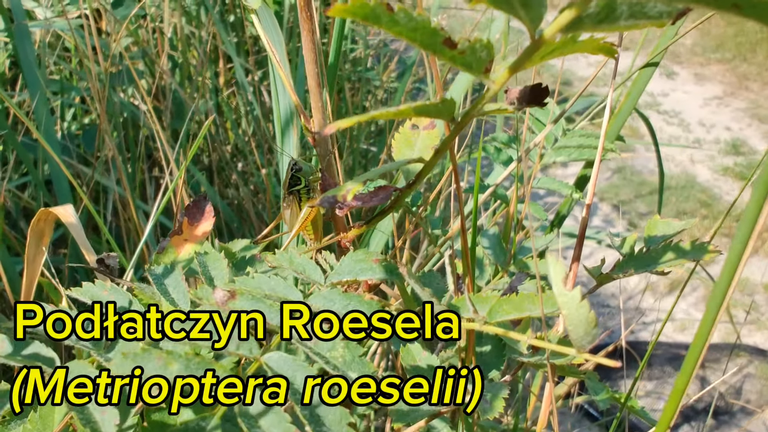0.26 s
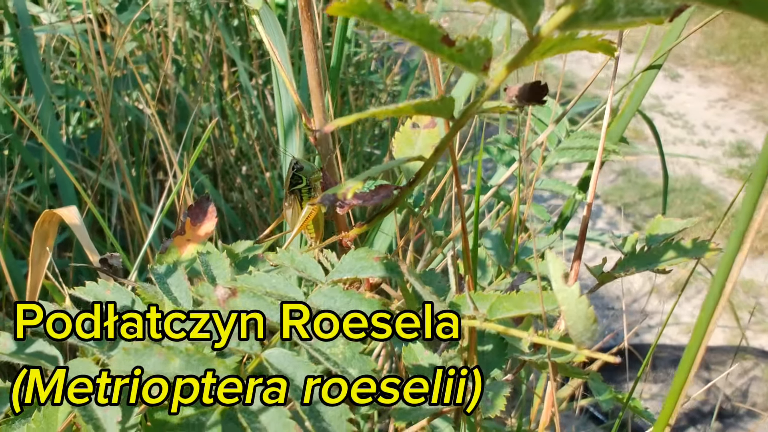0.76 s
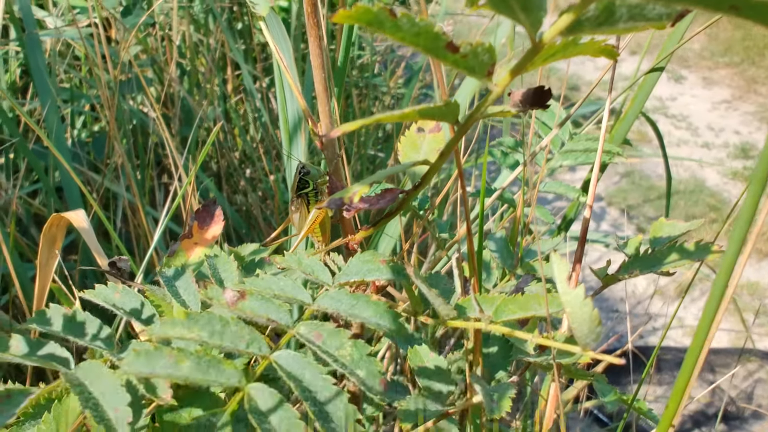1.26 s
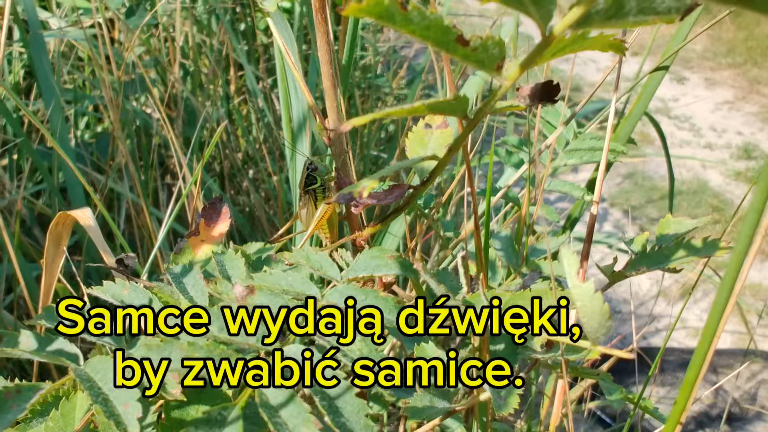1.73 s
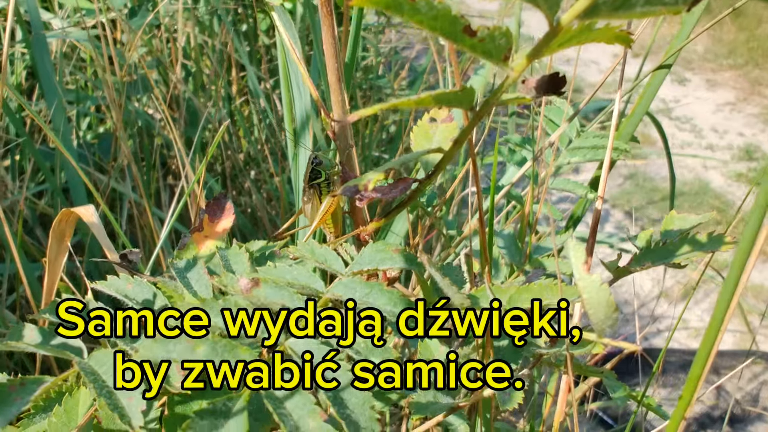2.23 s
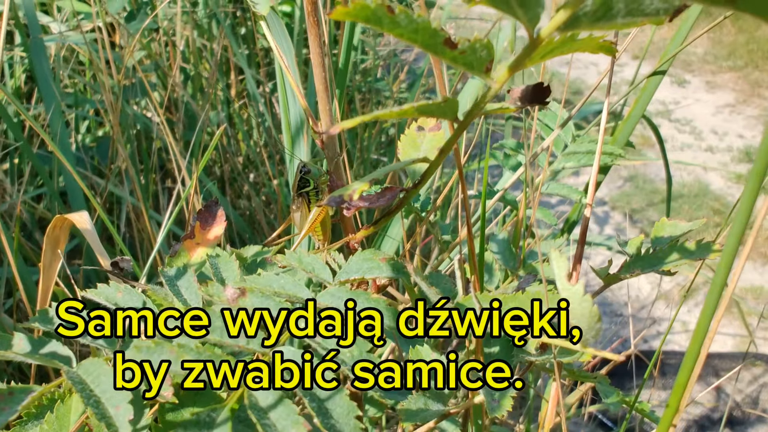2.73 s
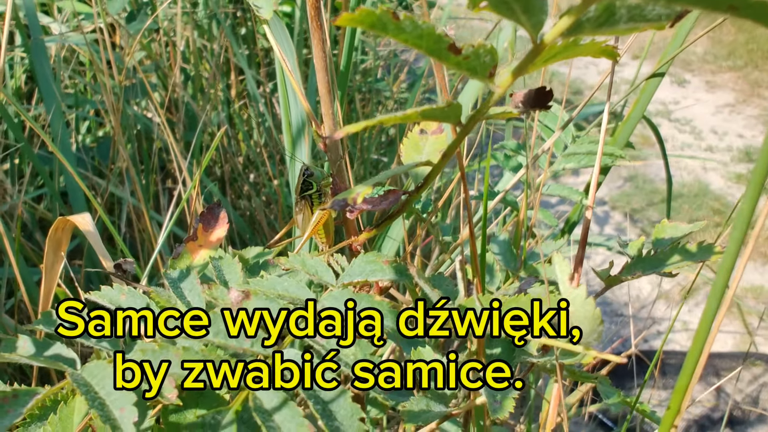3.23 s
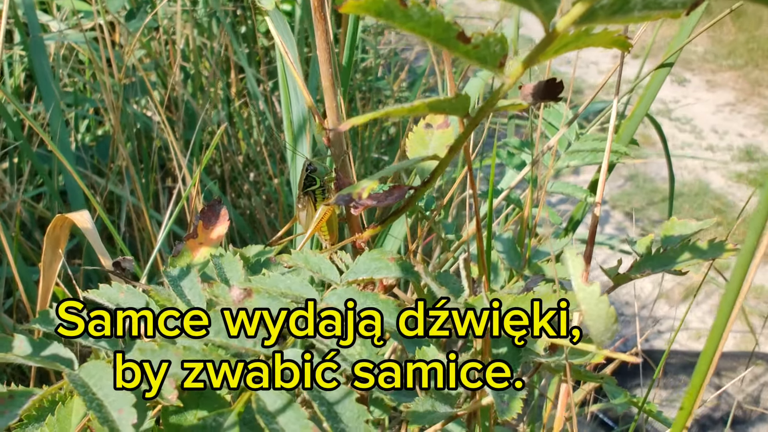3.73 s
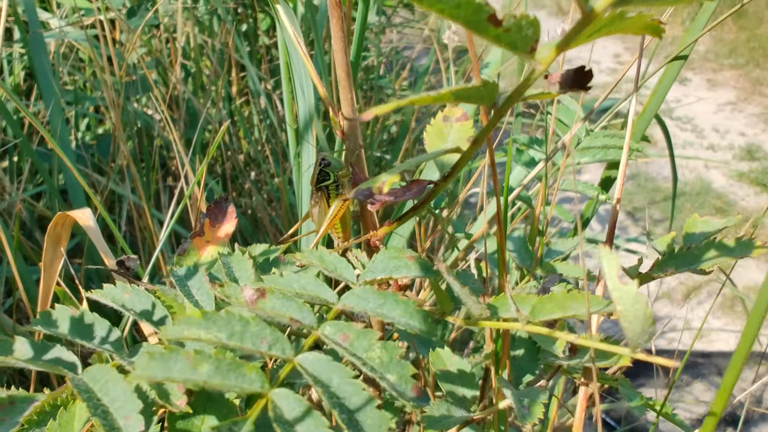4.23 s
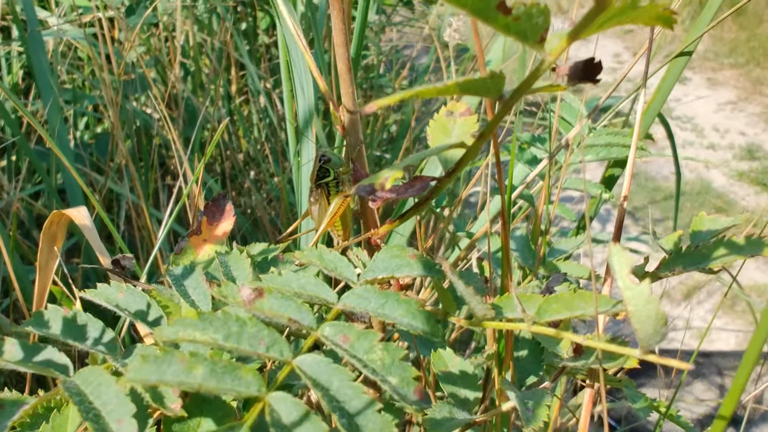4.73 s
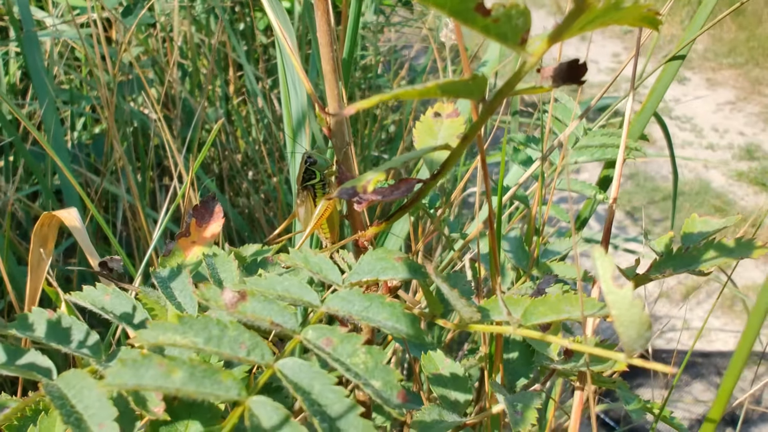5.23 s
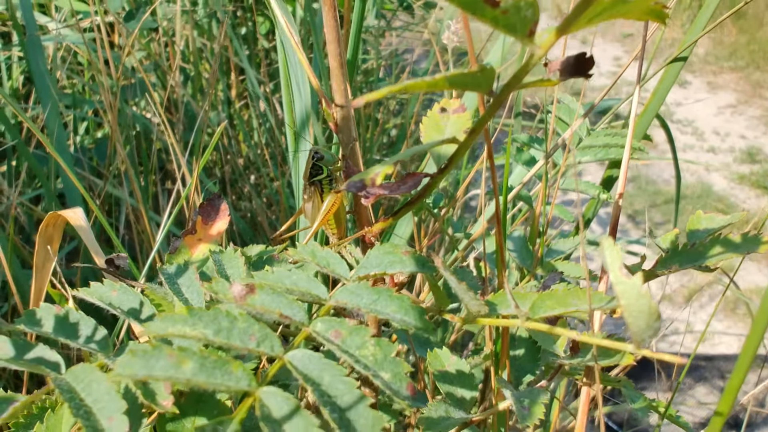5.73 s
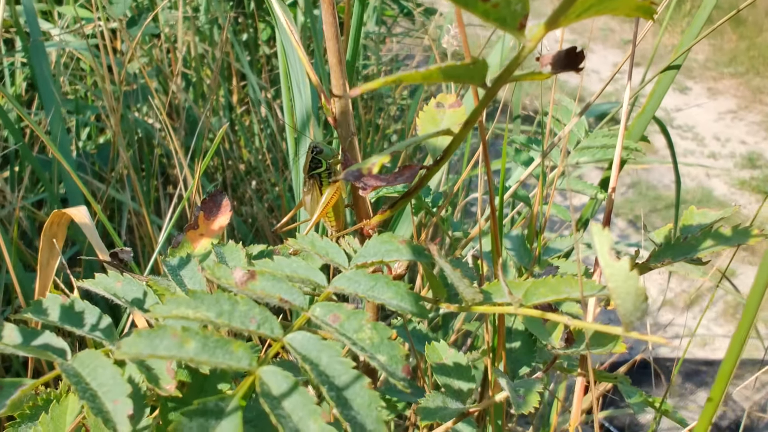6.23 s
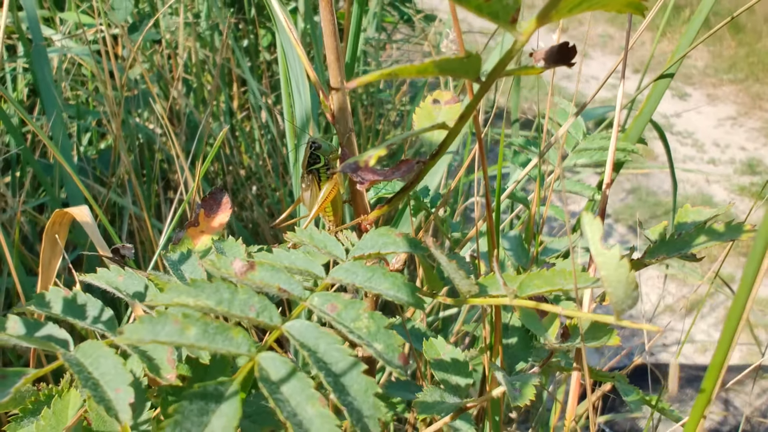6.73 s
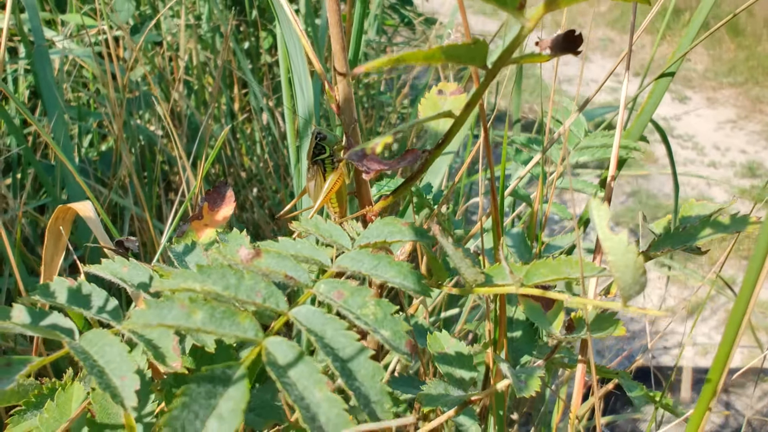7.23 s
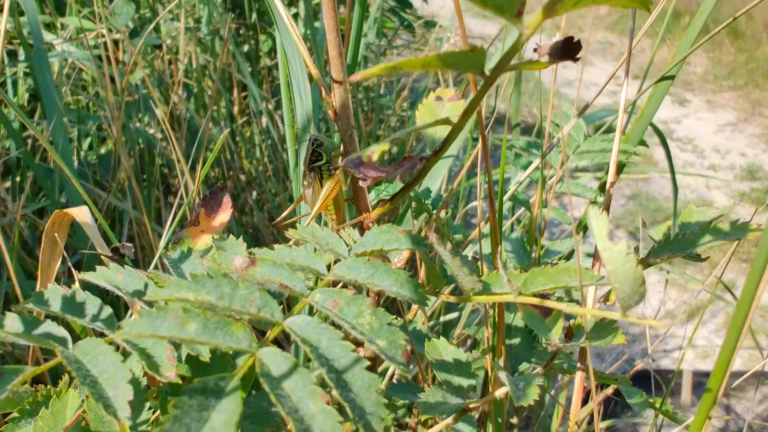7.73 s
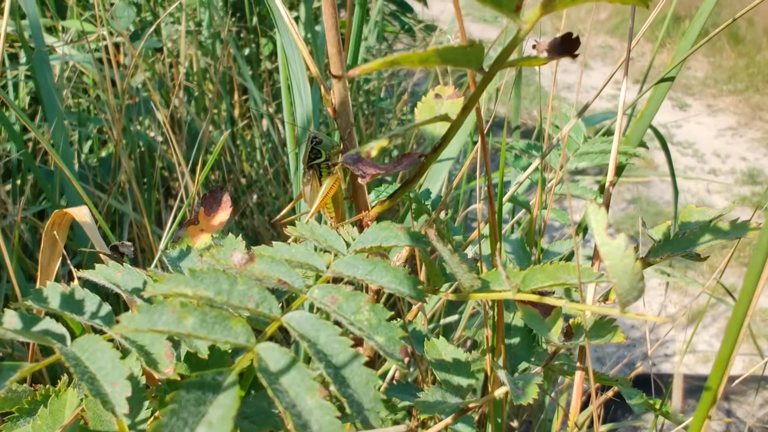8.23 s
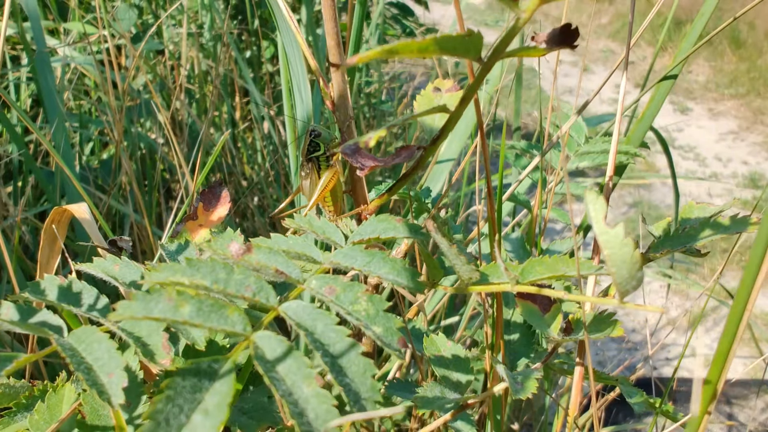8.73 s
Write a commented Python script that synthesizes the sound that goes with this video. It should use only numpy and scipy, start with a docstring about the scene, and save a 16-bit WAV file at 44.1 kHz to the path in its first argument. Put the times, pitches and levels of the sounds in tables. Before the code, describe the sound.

A bush-cricket buzzes a fast, dry, very high rasp without pause, close and slightly left, while a small bird whistles two brief phrases farther off.

```python
"""A bush-cricket buzzes close by, a little to the left, while a warbler sings two phrases further off, a fly hums,
leaves tick and rustle, far birds twitter faintly, overload clicks on the left, and far air rumbles and hisses.
The cricket makes about a hundred wing strokes a second from tooth clicks: a swelling rasp, a hard end and a dull
return. The warbler is gliding sine tones, the fly and low hums are unsteady tones, leaves, twitter and air are
shaped noise, the knocks of stems are damped swings, and the overload clicks last three samples."""
import sys
import numpy as np
from scipy import signal
from scipy.fft import rfft, irfft, next_fast_len
from scipy.io import wavfile
from scipy.ndimage import uniform_filter1d, minimum_filter1d, map_coordinates

SR = 44100
rng = np.random.default_rng(int(sys.argv[2]) if len(sys.argv) > 2 else 0)


def transcribe(signal):
    """Save signal, clipped to [-1, 1], as a 16-bit WAV file at the path in sys.argv[1]."""
    frames = np.atleast_2d(signal).T
    limited = np.clip(frames, -1, 1)
    pcm = np.round(limited * 32767).astype(np.int16)
    wavfile.write(sys.argv[1], SR, pcm)


N = 395136
T = np.arange(N) / SR  # time of each sample, s
STROKES_HZ = 101.3  # steady wing beat, before its slow drift
TOP_HZ = 15830  # band limit

# soft noise bursts of leaves and far birds:
# t/s, length/s, centre f/Hz, half width/share of centre, level/dB before fading, left-right difference/dB
NOISE_BURSTS = [(1, 0.0088, 4200, 0.09, -51, -12), (1.011, 0.0065, 4270, .15, -49, -8),
                (4.031, 0.0084, 4700, .18, -49, -2.5), (4.042, .005, 4440, 0.24, -48, -2.5),
                (4.534, .065, 4060, .2, -55.5, -9), (4.932, 0.13, 4900, 0.12, -59, 0),
                (4.98, .071, 3430, 0.11, -60, -5), (5.33, 0.089, 5050, 0.12, -57, -4),
                (5.564, 0.22, 5050, 0.077, -57, -2), (5.93, .17, 4800, .12, -58, -2),
                (7.04, .008, 4000, 0.33, -52, -9), (7.068, 0.019, 3460, 0.15, -48.5, -18),
                (8.226, .006, 3970, 0.13, -49, -12)]
TWITTER_FROM_HZ = 4750  # bursts centred above this are far birds, those below are leaves
FAR_BIRDS = [row for row in NOISE_BURSTS if row[2] > TWITTER_FROM_HZ]
LEAF_RUSTLES = [row for row in NOISE_BURSTS if row[2] <= TWITTER_FROM_HZ]


def amp(db):
    """Turn decibels into a multiplier."""
    return 10 ** (np.asarray(db) / 20)


def unit(x):
    """Scale a sound to an average (RMS) level of one."""
    return x / np.sqrt(np.mean(x ** 2) + 1e-20)


def along(points, hz):
    """Read a (f/Hz, value) curve on a logarithmic pitch axis."""
    f, value = np.transpose(points)
    return np.interp(np.log(hz + 1), np.log(f + 1), value)


def curves(rows, t=T):
    """Read one value per moment for each column after the time."""
    times, *columns = np.transpose(rows)
    return [np.interp(t, times, column) for column in columns]


def wobble(rate):
    """A smooth random curve with `rate` random points a second."""
    points = rng.standard_normal(int(N * rate / SR) + 4)
    return map_coordinates(points, [T * rate])


def filtered(x, response):
    """Change the strength and timing of each frequency in x by a response."""
    m = next_fast_len(N + 8192)
    spectrum = rfft(x, m) * response(np.fft.rfftfreq(m, 1 / SR))
    return irfft(spectrum, m)[..., :N]


def add(out, s, x, pan_db):
    """Mix a sound in at s seconds; positive pan_db leans left."""
    i = round(s * SR)
    sides = amp([[pan_db / 2], [-pan_db / 2]])
    out[:, i:i + len(x)] += (sides * x)[:, :N - i]


def scattered(x, t60):
    """Echoes off leaves: a fading noise tail, unrelated left and right, down 60 dB after t60 seconds."""
    t = np.arange(round(t60 * SR)) / SR
    fade = amp(-60 * t / t60) * (t > .001)
    tail = rng.standard_normal((2, len(t))) * fade
    return signal.oaconvolve(x, tail / np.linalg.norm(tail[0]), axes=1)[:, :N]


def teeth(passed, per_cycle, slip, scatter_db):
    """One click per tooth the scraper passes, a little early or late (slip, in teeth) and uneven in strength."""
    own_share = .1  # each port faces its own part of the wing: share of the power not common to both
    at = np.flatnonzero(np.diff(np.floor(passed)) == 1)
    exact = at + (np.floor(passed[at + 1]) - passed[at]) / (passed[at + 1] - passed[at])
    slip_samples = np.broadcast_to(slip, passed.shape)[at] * SR / STROKES_HZ / per_cycle
    taps, trains = np.arange(-6, 7), []
    # one shared click train, then one for each port
    for early, size in rng.standard_normal((3, 2, len(at))):
        hit = (exact + slip_samples * early)[:, None]
        near = np.round(hit).astype(int) + taps
        # a short windowed sinc places each click between samples
        shape = np.sinc(near - hit) * np.cos((near - hit) * np.pi / 14) ** 2
        click = amp(scatter_db * size)[:, None] * shape
        train = np.bincount(np.clip(near, 0, N - 1).ravel(), click.ravel(), N)
        trains.append(unit(train))
    return np.sqrt(1 - own_share) * trains[0] + np.sqrt(own_share) * np.array(trains[1:])


def wing(colour, right_db=0):
    """The wing's ringing colour, with delays that differ by frequency and between the two ports."""
    # extra delay of each frequency, making the pitch sag as a stroke ends: f/Hz, delay/ms
    sag = [(8500, 0.0016), (10000, 0.2), (11500, 0.52), (13500, 0.5), (15500, 0.12)]
    # the camera body bends sound on its way to the right port: f/Hz, phase lead/radians
    body_bend = [(6000, .7), (7200, .4), (8200, .7), (9400, 2.1), (10200, 2.8), (11200, 3.4), (12400, 1.5),
                 (13600, 2.0), (14600, 1.9), (15200, 3.4), (15800, 3.9)]
    port_delay_s = 16 / 44100  # the right port hears the wing later

    def response(hz):
        late_cycles = np.cumsum(along(sag, hz) / 1000) * hz[1]  # hz[1] is the frequency step
        right_cycles = port_delay_s * hz - along(body_bend, hz) / (2 * np.pi)
        port_cycles = np.array([[0], [1]]) * right_cycles
        level_db = along(colour, hz) + np.array([[0], [right_db]])
        return amp(level_db) * np.exp(-2j * np.pi * (late_cycles + port_cycles))
    return response


def seen_through_leaves(song):
    """Leaves shade the left and right sound differently as the view blends between four angles."""
    # shading from each angle: f/Hz, then left level/dB and right level/dB for angles 0, 1, 2, 3
    leaf_shade = [(6500.0, -7.5, -5.5, -2.0, -0.0, -6.0, -1.5, -4.5, -0.0),
                  (7000.0, -10.5, -2.0, -3.0, 3.5, -6.0, 3.5, -5.0, 4.5),
                  (7500.0, -3.5, 1.5, 2.0, 5.0, 0.0, 5.5, 1.0, 6.0),
                  (8000.0, -2.0, 2.5, 1.0, 1.5, -2.5, 2.0, 0.5, 2.5),
                  (8500.0, -0.5, -0.5, -0.0, -2.0, -1.5, -3.0, -1.0, -3.0),
                  (9000.0, -6.0, -8.5, -5.5, -11.0, -7.0, -11.5, -5.0, -9.0),
                  (9400.0, -7.0, -6.0, -5.0, -8.5, -7.5, -9.5, -6.5, -10.5),
                  (9800.0, -4.0, -8.0, -3.0, -11.5, -4.5, -13.5, -3.0, -13.0),
                  (10200.0, -1.5, -4.0, 2.5, -8.5, 2.5, -8.0, 8.0, -6.0),
                  (10500.0, -3.0, -7.5, 2.0, -9.5, -0.0, -8.5, 3.5, -5.0),
                  (10800.0, -3.5, -7.5, 3.0, -9.0, 2.5, -13.5, 2.5, -15.0),
                  (11200.0, -1.0, -8.5, 3.0, -10.5, -0.0, -11.5, 1.5, -15.0),
                  (11500.0, -2.0, -17.0, -1.5, -17.0, 0.5, -12.5, -0.5, -13.5),
                  (11800.0, -3.0, -14.0, 1.5, -17.0, -1.0, -12.0, -2.5, -13.0),
                  (12100.0, -2.5, -12.0, 0.5, -15.5, -2.5, -15.0, 1.0, -9.0),
                  (12400.0, -3.5, -12.5, 1.5, -11.5, -0.5, -8.5, -0.5, -7.0),
                  (12700.0, -1.0, -16.5, 2.5, -15.5, 2.5, -9.5, 4.0, -3.0),
                  (13000.0, 0.5, -7.5, 3.0, -6.5, 1.0, -8.5, 1.5, -5.0),
                  (13300.0, 3.0, -14.0, 5.0, -6.5, -0.5, -3.5, 1.5, -3.5),
                  (13600.0, -1.0, -9.0, 1.5, -6.0, 3.0, -1.0, 7.5, 2.5),
                  (13850.0, 1.5, -9.0, 4.0, -7.0, 2.5, -5.5, 3.0, -6.5),
                  (14100.0, 0.5, -5.0, 2.0, -4.0, 4.0, 3.0, 1.0, -0.0),
                  (14350.0, -3.5, -11.5, -1.0, -7.0, -6.0, -9.0, -5.0, -5.5),
                  (14600.0, -6.0, -18.5, -1.5, -16.0, -3.5, -14.0, -3.0, -11.0),
                  (14850.0, -3.0, -10.0, -2.0, -15.0, -6.5, -20.0, -4.0, -15.5),
                  (15100.0, 0.5, -5.0, 0.5, -10.5, -1.5, -9.0, -3.0, -16.5),
                  (15350.0, -1.0, -0.5, -0.5, -6.5, -0.5, -6.0, -5.0, -9.5),
                  (15600.0, 0.5, -3.5, 1.0, -6.5, -2.0, -11.0, -2.0, -7.5),
                  (15800.0, -1.0, -5.5, -1.5, -11.0, -5.5, -16.5, -1.5, -10.0)]
    # how the view turns: t/s, viewing angle (0 to 3)
    view_turn = [(0, 0), (.45, 0), (1.0, 1), (4.4, 1), (5.15, 2), (6.3, 2), (6.7, 3), (8.96, 3)]
    angle, = curves(view_turn)
    hz, *shade = np.transpose(leaf_shade)
    seen = 0
    for k in range(4):
        def tint(f):
            left_db = np.interp(f, hz, shade[2 * k])
            right_db = np.interp(f, hz, shade[2 * k + 1])
            return amp([left_db, right_db])
        nearness = np.clip(1 - abs(angle - k), 0, 1)
        seen = seen + nearness * filtered(song, tint)
    return seen


def cricket():
    """A scraper runs over file teeth: a swelling rasp, a hard snap and click, then a dull return stroke."""
    # drift of the wing beat: t/s, lead over a steady beat/strokes
    beat_lead = [(0, -.24), (.48, .04), (.8, .17), (1.04, .2), (1.6, .41), (2.4, .58), (3.2, .67),
                 (3.9, .7), (4.48, .68), (5.28, .57), (5.44, .53), (5.72, .55), (6.08, .42), (6.56, .08),
                 (6.75, .06), (7.15, .1), (7.36, .02), (7.68, .01), (8.16, -.07), (8.32, -.18),
                 (8.96, -.19)]
    # slow loudness of the song: t/s, level/dB
    song_level = [(0, -6.5), (.35, -8), (.7, -9), (1.2, -10), (2.1, -11), (4.6, -10.5), (5.7, -9),
                  (6.6, -10.5), (7.4, -10.5), (8.96, -11)]
    # wing colour in the rasp, the snap, the last click and the return stroke, each: f/Hz, level/dB
    rasp_colour = [(2500, -64.5), (4130, -18), (5510, -42.5), (7060, -33.5), (8440, -19.5), (9400, -8),
                   (10510, -18.5), (11200, -15), (13440, -16.5), (13950, -10), (15680, -2)]
    snap_colour = [(2500, -51), (3960, -84), (5510, -47), (7000, -18), (7750, -14.5), (9300, -8),
                   (10510, -15), (11540, -12.5), (13260, -7), (14200, 3.5), (15680, 7)]
    release_colour = [(2500, -52.5), (5510, -42), (7000, -15.5), (9300, -3.5), (10510, -9), (11540, -10.5),
                      (12600, 1.5), (13500, 7.5), (14400, 8), (15680, 4)]
    return_colour = [(2500, -44.5), (3620, -96), (4820, -33.5), (6550, -28.5), (7750, -18), (8610, -14),
                     (9400, -11), (10510, -20), (13090, -11.5), (14640, -42), (15680, -31)]
    file_teeth = 27.5  # teeth passed per wing cycle, before the changes of pace
    pace_scatter, start_scatter = .013, .15  # share of the pace; first tooth, in teeth
    hurry_from, hurry = -.2, .4  # speeding up begins at this share of a cycle; how strongly
    steady_from, early_slip, steady_slip = -.3, .2, .018  # stutters early on, then runs evenly (slips in teeth)

    beat = STROKES_HZ * T + curves(beat_lead)[0]
    stroke = np.floor(beat + .65).astype(int)
    chance = rng.standard_normal((stroke.max() + 2, 7))[stroke]  # seven small differences per stroke
    u = beat - stroke + 0.0046 * chance[:, 0] + 0.0038  # share of a cycle after the snap
    pace = file_teeth * (1 + pace_scatter * chance[:, 5])
    travel = u + hurry * np.maximum(u - hurry_from, 0) ** 2
    passed = pace * travel + start_scatter * chance[:, 6]
    stutter = np.interp(u, [steady_from - .08, steady_from], [early_slip, steady_slip])

    # the rasp swells, then drops; the snap peaks at u = 0
    rasp_db = np.where(u < -.04, 31 * (u + 0.18) - 1.5, -130 * (u + 0.11) + 0.74)
    rasp = amp(0.081 * chance[:, 1] + rasp_db)
    snap = amp(0.5 * chance[:, 2] + np.where(u < 0, 110 * u, -300 * u) + 1.0)
    # the scraper leaves the last tooth with one click; a harder snap has a weaker click
    leaves_file = (u >= 0) * (np.roll(u, 1) < 0)
    release = amp(13.5 - 2 * chance[:, 2]) * leaves_file
    v = (beat + 0.167) % 1 - .5 + 0.0038 * chance[:, 3]  # share of a cycle after the wings reopen
    main_bump = np.exp(-.5 * (v / 0.017) ** 2)
    later_bump = 0.16 * np.exp(-.5 * ((v - .18) / 0.056) ** 2)
    back = amp(0.36 * chance[:, 4]) * (main_bump + later_bump + 0.24)

    rasp_clicks = rasp * teeth(passed, file_teeth, slip=stutter, scatter_db=1.6)
    song = filtered(rasp_clicks, wing(rasp_colour))
    snap_clicks = snap * teeth(passed, file_teeth, slip=.035, scatter_db=0.7)
    song += filtered(snap_clicks, wing(snap_colour))
    song += filtered(release, wing(release_colour))
    back_clicks = back * teeth(60 * beat, 57, slip=0.41, scatter_db=1.0)
    song += filtered(back_clicks, wing(return_colour, right_db=6))  # this stroke faces the right port
    song = song + amp(-13) * scattered(song, t60=0.028)
    seen = seen_through_leaves(song)
    return amp(curves(song_level)[0] + 0.78 * wobble(5)) * seen


def warbler():
    """Gliding sine whistles, trilled and hoarse in pitch, throbbing in loudness, with soft echoes."""
    # four notes by name, each a glide: t/s, f/Hz, level/dB within the note
    note_glides = { "drop": [(0, 5850, -24), (.016, 5430, -16), (.034, 5650, -31), (.044, 5100, -5),
                   (.052, 3900, -15.5), (.066, 3600, -19), (.076, 3640, -10), (.09, 3800, -17),
                   (.108, 3770, -16), (.116, 3700, -26)], "steps": [(0, 6300, -22), (.016, 4700, -16),
                   (.026, 4280, -7.5), (.064, 4200, -8), (.088, 3400, -21), (.1, 3400, -8),
                   (.104, 3280, -35), (.112, 4430, -15), (.122, 4650, -15.5), (.13, 4270, -13),
                   (.138, 4270, -11), (.146, 4560, -21)], "glide": [(0, 5580, -22), (.012, 5000, -4),
                   (.024, 4400, -4), (.058, 4250, -14), (.085, 3350, -6), (.1, 3310, -16),
                   (.104, 3210, -40), (.114, 5400, -15), (.124, 4680, -3), (.14, 4600, -19)],
                   "hook": [(0, 6700, -12), (.014, 5000, -9), (.022, 4720, -6.5), (.064, 4620, -9),
                   (.07, 4680, -18), (.084, 5100, -4), (.102, 3580, -13), (.11, 3440, -10),
                   (.118, 3380, -22)], }
    # the notes sung: t/s, level/dB, left-right difference/dB, note name
    sung_notes = [(0.104, -41, -10, "drop"), (0.488, -34.5, -2, "steps"), (0.863, -35, -4, "drop"),
                  (1.267, -38.5, -3, "hook"), (7.243, -56, -2, "glide"), (7.597, -48.5, 1, "drop"),
                  (7.963, -46, -3, "glide"), (8.352, -40, -8.5, "hook"), (8.737, -34, -10, "drop")]
    trill_hz, trill_depth, hoarse = 75, .008, .015  # depths as shares of the pitch
    out = np.zeros((2, N))
    trill = trill_depth * signal.sawtooth(-2 * np.pi * trill_hz * T)
    shake = 1 + trill + hoarse * wobble(300)
    for s, db, pan_db, note in sung_notes:
        glide = note_glides[note]
        hz, level_db = curves(glide, np.arange(round(glide[-1][0] * SR)) / SR)
        hz = hz * shake[round(s * SR):][:len(hz)]
        whistle = np.sqrt(2) * np.sin(2 * np.pi * np.cumsum(hz) / SR)
        add(out, s, amp(db + level_db) * whistle, pan_db)
    out *= amp(2.5 * np.array([wobble(110), wobble(100)]))
    return out + amp(-2) * scattered(out, t60=.06) + amp(-9) * scattered(out, t60=.2)


def noise_bursts(rows):
    """Bursts of noise, each kept to one band and faded in and out."""
    out = np.zeros((2, N))
    for s, length, hz, width, db, pan_db in rows:
        n = round(length * SR)
        edges = [hz * (1 - width), hz * (1 + width)]
        band = signal.butter(2, edges, "band", fs=SR, output="sos")
        noise = unit(signal.sosfilt(band, rng.standard_normal(n)))
        add(out, s, amp(db) * np.hanning(n) ** .5 * noise, pan_db)
    return out


def leaves():
    """Dry leaves rustle as bursts of band noise; stems knock as one quickly damped swing."""
    # stem knocks: t/s of the peak, f/Hz, peak level/dB before panning, left-right difference/dB
    stem_knocks = [(2.718, 2980, -40, 6), (4.193, 1780, -40, -6), (8.2295, 786, -30.5, -7)]
    out = noise_bursts(LEAF_RUSTLES)
    for s, hz, db, pan_db in stem_knocks:
        cycles = np.arange(round(4 * SR / hz)) * hz / SR
        swing = -np.sin(2 * np.pi * cycles - 1.6) * cycles * np.exp(-2.2 * cycles) * 6
        add(out, s - .5 / hz, amp(db) * swing, pan_db)
    return out


def overload_clicks():
    """Thin, broadband clicks on the left where the recorder overloads: three samples each, at set times."""
    # the clicks: t/s, left peak level/dB
    overloads = [(0.099, -19), (.739, -33), (0.9862, -18), (1.939, -17.5)]
    pan_db = 24
    out = np.zeros((2, N))
    for s, db in overloads:
        add(out, s, amp(db - pan_db / 2) * np.array([-.4, 1, .6]), pan_db)
    return out


def drones(rows, waver_hz, waver_db, overtone):
    """Unsteady tones that fade in and out, each with an optional tone a fifth above (1.5 times its pitch)."""
    fade_s = 0.29
    out = np.zeros(N)
    for s, length, first_hz, last_hz, db in rows:
        fade = np.clip(np.minimum(T - s, s + length - T) / fade_s, 0, 1)
        glide_hz = np.interp(T, [s, s + length], [first_hz, last_hz])
        hz = glide_hz + waver_hz * (wobble(8.2) + 0.685 * wobble(25))
        turn = 2 * np.pi * np.cumsum(hz) / SR
        tone = np.sin(turn) + overtone * np.sin(1.5 * turn)
        out += fade * amp(db + waver_db * wobble(6)) * tone
    return out


def fly():
    """A fly hums: a wavering tone and a softer one a fifth above."""
    # hums of the fly: t/s, length/s, first f/Hz, last f/Hz, level/dB before wavering
    fly_hums = [(4.85, 1.1, 375, 389, -65.5), (8.2, 1.4, 400, 404, -66)]
    return drones(fly_hums, waver_hz=9, waver_db=4, overtone=.5)


def far_birds():
    """Faint far bird twitter, as soft bursts of narrow noise near 5 kHz."""
    return noise_bursts(FAR_BIRDS)


def low_hums():
    """Thin low tones wander in and out of the far rumble."""
    # the low hums: t/s, length/s, first f/Hz, last f/Hz, level/dB before wavering
    far_hums = [(.85, 0.93, 196.5, 195.3, -63), (1.55, .75, 185, 150, -64), (3.2, 1.44, 155, 142.2, -68),
                (3.7, 2.14, 119.7, 118.8, -66.5), (5.3, 0.78, 178, 166.6, -63.5),
                (8.1, 0.59, 159, 159, -65)]
    return drones(far_hums, waver_hz=3.07, waver_db=6, overtone=0)


def air():
    """Patchy far noise, rumble and hiss: near mono in the deep bass, more spread above."""
    # colour of the noise: f/Hz, relative level/dB per Hz
    air_colour = [(15, -53), (25, -14), (55, -3.5), (150, 0.5), (228, -6.5), (491, -9), (539, -9.5),
                  (696, -8), (1370, -9.5), (1650, -11), (2030, -9.5), (4800, -16.5), (6500, -11),
                  (8450, -13), (14300, -120)]
    # loudness of the two parts: t/s, rumble level/dB, hiss level/dB
    air_level = [(0, -62, -58.5), (.4, -64.5, -57), (.8, -62.5, -53.5), (2.2, -60.5, -55.5),
                 (4.2, -60.5, -53.5), (5.6, -60, -52), (7.4, -62, -53), (8.2, -60, -51), (8.96, -63, -51)]
    # likeness of left and right: f/Hz, correlation (-1 to 1)
    likeness = [(40, 0.9), (200, 0.46), (500, 0.29), (900, -0.52), (1500, -0.38), (2500, -0.034),
                (5000, 0.28)]
    z = signal.stft(rng.standard_normal((2, N)), nperseg=512)[2]
    # smooth random patches over pitch, then over time
    field = uniform_filter1d(rng.standard_normal(z.shape[1:]), 5, 0)
    field = uniform_filter1d(field, 10, 1)
    pair = signal.istft(z * amp(1.93 * unit(field)), nperseg=512)[1][:, :N]

    def colour_and_spread(hz):
        turn = np.arccos(np.clip(along(likeness, hz), -1, 1)) / 2
        return amp(along(air_colour, hz)) * [np.ones_like(hz), np.tan(turn)]

    mid, side = filtered(pair, colour_and_spread)
    both = np.array([mid + side, mid - side]) * amp([[-.7], [.7]])
    low = filtered(both, lambda hz: 1 / (1 + (hz / 350) ** 4))
    rumble_db, hiss_db = curves(air_level)
    return amp(rumble_db) * unit(low) + amp(hiss_db) * unit(both - low)


def scene():
    """All the sources together, from the main one to the background."""
    near = cricket() + warbler() + leaves() + overload_clicks()
    return near + fly() + far_birds() + low_hums() + air()


def record(dry):
    """Remove everything above the band limit and let a quick limiter catch the loudest peaks."""
    ceiling, span = .96, round(.0006 * SR)  # limiter ceiling (full scale is 1); smoothing span, samples
    heard = filtered(dry, lambda hz: hz < TOP_HZ)
    needed = np.minimum(1, ceiling / (abs(heard) + 1e-9))
    needed = minimum_filter1d(needed, 2 * span, axis=1)
    gain = uniform_filter1d(uniform_filter1d(needed, span, axis=1), span, axis=1)
    return filtered(gain * heard, lambda hz: hz < TOP_HZ)


dry = scene()
out = record(dry)
transcribe(out)
```